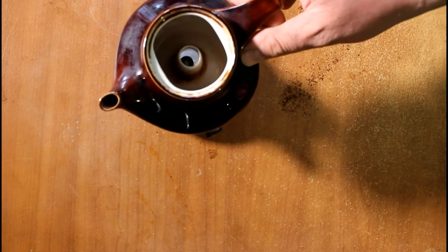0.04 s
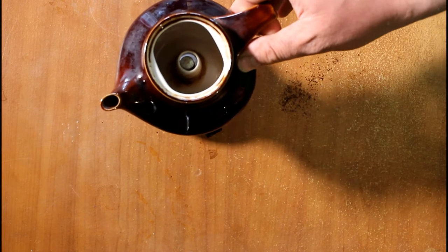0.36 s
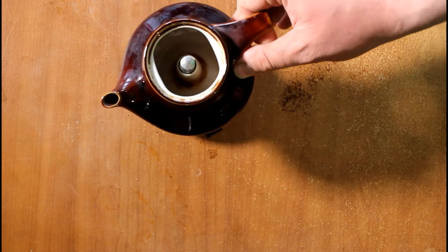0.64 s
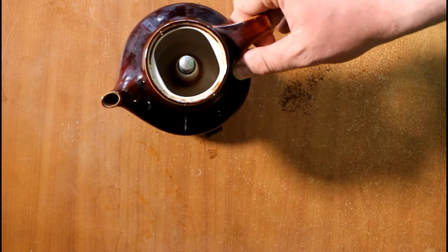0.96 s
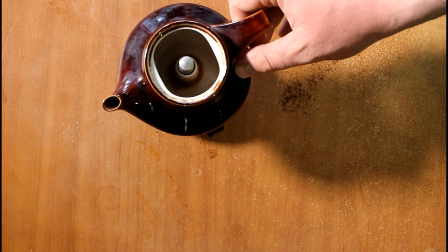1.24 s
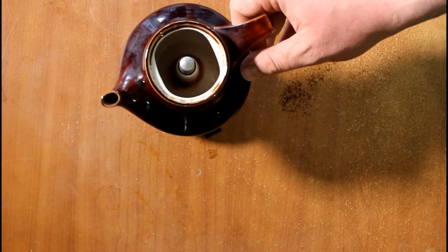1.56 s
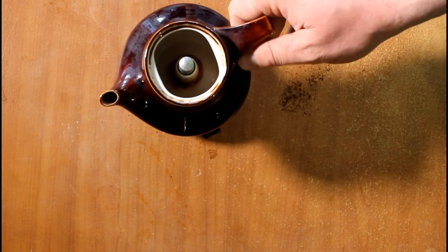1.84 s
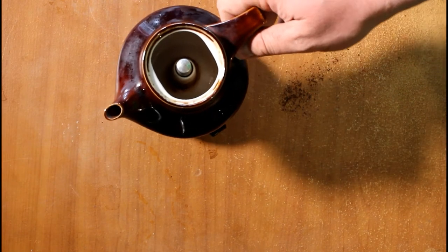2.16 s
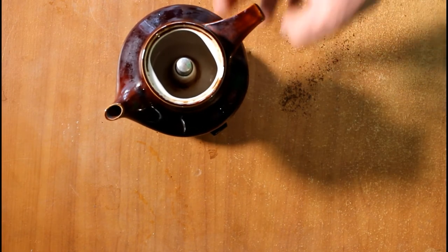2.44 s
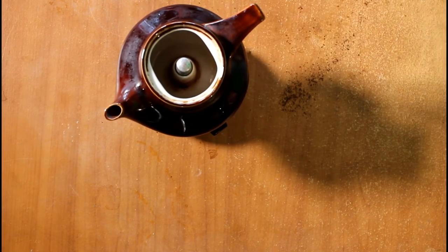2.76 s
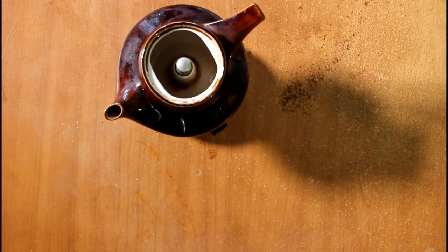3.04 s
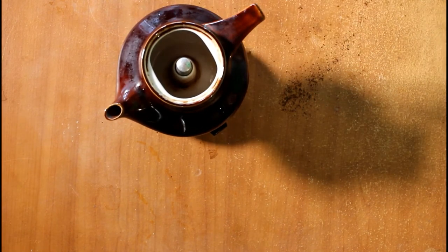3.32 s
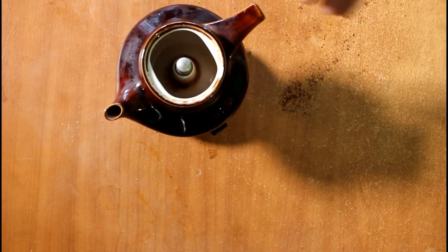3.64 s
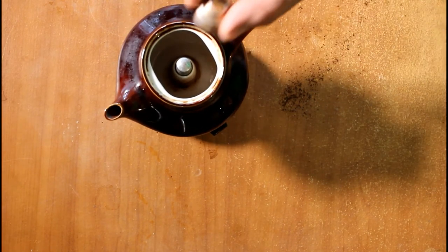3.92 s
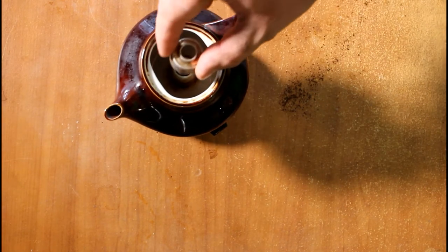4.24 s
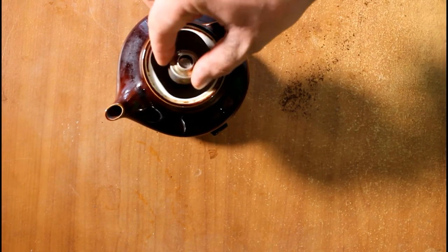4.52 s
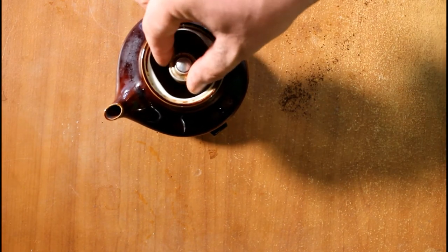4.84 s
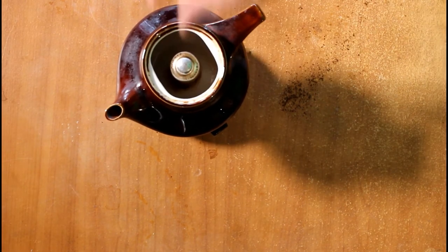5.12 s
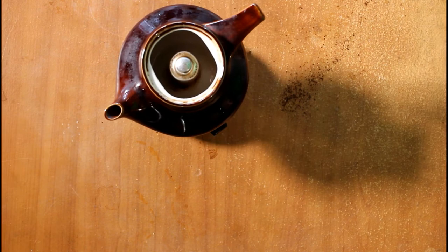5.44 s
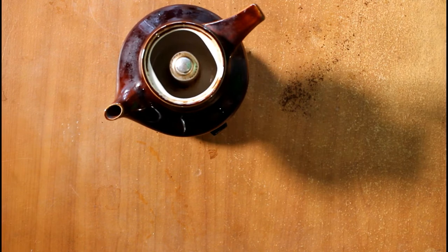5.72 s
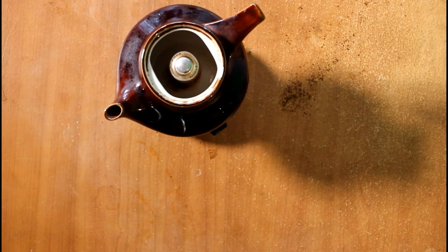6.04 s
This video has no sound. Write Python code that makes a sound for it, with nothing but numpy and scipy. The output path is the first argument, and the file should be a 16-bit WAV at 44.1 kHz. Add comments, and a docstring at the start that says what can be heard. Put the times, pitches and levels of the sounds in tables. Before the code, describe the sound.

A porcelain teapot scrapes and clanks onto a metal pot, knocks as it settles, then a small metal cap clinks inside.

```python
"""A wooden table in a small quiet room, one microphone close in front. A porcelain teapot scrapes down
onto a metal pot, catching and slipping, and lands at 0.7 s with a clank that overloads the microphone.
It rocks and settles, fingertips squeaking on the glaze; near 3 s a sleeve swishes and a hand scuffs.
At 4.5 s a small metal cap is lowered through the teapot's mouth and clinks against the china.
It is seated on the pot's stem at 5.1 s, and the sleeve swishes twice more over the room's air."""
import sys
import numpy as np
from scipy import signal
from scipy.fft import rfft, irfft, next_fast_len
from scipy.io import wavfile
from scipy.ndimage import map_coordinates

SR = 44100
rng = np.random.default_rng(int(sys.argv[2]) if len(sys.argv) > 2 else 0)


def store_wav(level_fs):
    """Save 16-bit WAV to argv[1]."""
    pcm = np.round(np.clip(np.atleast_2d(level_fs), -1, 1) * 32767)
    wavfile.write(sys.argv[1], SR, pcm.T.astype(np.int16))


N = 268172
T = np.arange(SR * 3 // 5) / SR  # the time that one contact rings [s]

# Knocks that ring the pot: the teapot against it, and at 5.1 s the cap seating on its stem; # base, wall and
# china are relative to the force: # (time [s], force [dB], base [dB], wall [dB], china [dB], contact hardness
# [Hz])
POT_KNOCKS = [(0.236, -36, 2.5, -13, -10, 4960), (0.264, -32, -1, -29, 6, 5530),
              (.299, -32, -6, -27, 8, 4000), (0.668, -14, -4.5, -1.5, -17, 1540),
              (0.6856, 1, 8, 5, -10, 8060), (0.728, -35, -1, 15, -1, 4000),
              (0.8003, -11, 15, 7, 2.5, 4100), (1.026, -58.5, -7, -13, 34.5, 3010),
              (1.078, -29.5, 10, -26, -20, 900), (1.759, -31.5, 2.5, -16, -18, 900),
              (1.816, -27, -8, -5, 4, 7100), (1.9474, -25.5, 4, -16, -8, 3246),
              (2.3098, -9, 13.5, 3.5, 7, 7740), (2.3755, -21, 5, -3, -15, 2000),
              (2.831, -35.5, -16, -17, -20, 350), (5.1053, -31, 15, 6.5, 11, 2000)]
# Modes of the struck bodies: (frequency [Hz], level [dB], t60 [s])
TABLETOP_MODES = [(78, -24, .4), (156, -14.5, .32), (228, -10, .19), (254, 1, .08), (337, -11.5, .2),
                  (394, -15, .21)]
POT_BASE_MODES = [(580, -20, .08), (640, 0, .06), (712, -22, .11), (1040, -24, .06)]
POT_WALL_MODES = [(1390, -11, .07), (1662, -9, .055), (1775, -5, .055), (1799, -8.5, .13), (1855, -12, .15),
                  (1884, -8.5, .1), (2060, -19, .17)]
CHINA_MODES = [(2994, -16, .16), (3068, -16, .19), (3620, -31, .16), (4461, -21, .22), (4759, -24, .12),
               (5678, -26, .22), (7687, -23, .14), (8245, -36, .2)]
# Spectrum of the contact's crack: (frequency [Hz], level [dB])
CRACK_SPECTRUM = [(60, -4), (100, -14), (320, 3.5), (480, -9), (660, 8.5), (850, -7), (1300, -6.5),
                  (1900, -6), (2600, -11), (3800, -7), (7000, -18), (11000, -24), (16000, -21.5)]


def pot_knocks(pass_down_s=0.0025):
    """Each knock rings the china and the pot's wall, then passes down to the pot's base and the table."""
    out = np.zeros(N)
    for s, force_db, base_db, wall_db, china_db, hard_hz in POT_KNOCKS:
        contact = lambda hz: 1 / np.sqrt(1 + (hz / hard_hz) ** 4)  # soft contact cannot drive high modes
        thud = amp(2) * ring(TABLETOP_MODES, contact, scatter_db=1.5)
        clonk = amp(base_db) * ring(POT_BASE_MODES, contact, scatter_db=-3.5)
        chime = amp(china_db) * ring(CHINA_MODES, contact, scatter_db=3.5)
        # the thin wall has a crowd of weak modes around its main ones, which rattle on
        rattle = amp(-24.5) * burst(lambda hz: 1 / (1 + ((hz - 1830) / 240) ** 2), t60=0.42)
        clang = amp(wall_db) * (ring(POT_WALL_MODES, contact, scatter_db=0.5) + rattle)
        crack = burst(lambda hz: amp(along(CRACK_SPECTRUM, hz)) * contact(hz), t60=0.046)
        # the pot rings right under the microphone, so it is almost dry
        strike = in_room(clang + chime, wet_db=-32) + in_room(crack, wet_db=-4.5)
        below = in_room(clonk, wet_db=-22.5) + in_room(thud, wet_db=-23.5)
        add(out, s, amp(force_db) * strike)
        add(out, s + pass_down_s, amp(force_db) * below)
    return out


# Chinks of the sliding teapot, then the cap's contacts:
# (time [s], clack [dB], ring [dB], china over cap [dB], brightness [Hz], spread [octaves])
LIGHT_CONTACTS = [(.468, -30.5, -19, 2, 3920, 0.099), (0.514, -49, -27, -6, 4100, 0.087),
                  (.602, -51, -25.5, -2, 4500, 0.24), (4.469, -22.5, -11, 3.5, 2990, 0.29),
                  (4.4704, -21.5, -4, -15, 6460, 1.37), (4.6793, -39, -16, -10, 4600, 0.22),
                  (4.679, -64, -29.5, 21, 7800, 0.16), (4.7402, -36.5, -47, 13, 3070, 0.33),
                  (4.8393, -38, -50, 3, 3000, .25), (4.9251, -25.5, -51, 3, 2600, 0.37),
                  (4.9658, -21.5, -14, 10, 7340, 0.12), (4.993, -30, -28, 5.5, 3300, 0.28),
                  (5.1056, -21.5, -52, 6, 2320, 0.34)]
# Modes of the metal cap: (frequency [Hz], level [dB], t60 [s])
CAP_MODES = [(3280, -11, .04), (3695, -14, .13), (4765, -3, .07), (5655, -13, .035), (7230, -19, .07),
             (8500, -14, .035), (9735, -10, .11), (13100, -22, .06), (13800, -25, .05)]
# Spectra of china ticking on metal and of the duller clack: (frequency [Hz], level [dB])
TICK_SPECTRUM = [(400, -41), (1700, 3.5), (2500, -8.5), (3200, 4.5), (4000, -1), (5400, -6.5), (6500, -15),
                 (8000, -11.5), (9700, -5), (11200, -27.5), (13200, -31), (16000, -45)]
CLACK_SPECTRUM = [(100, -21), (420, 0.5), (600, 8), (1200, 6.5), (2000, -2.5), (3500, -15.5), (8000, -31.5),
                  (16000, -60)]


def clinks(jolt_hz=3300):
    """Light hard contacts tick, ring china and cap, and clack down the stem into the table."""
    out = np.zeros(N)
    for s, clack_db, ring_db, china_db, bright_hz, octaves in LIGHT_CONTACTS:
        band = lambda hz: 1 / (1 + (np.log2((hz + 1) / bright_hz) / octaves) ** 2)
        tick_colour = lambda hz: amp(along(TICK_SPECTRUM, hz)) * band(hz)
        tick = amp(ring_db - 2) * burst(tick_colour, t60=0.021, swell_s=0.0003)
        chime = amp(ring_db + china_db) * ring(CHINA_MODES, band, scatter_db=2)
        ping = amp(ring_db) * ring(CAP_MODES, band, scatter_db=2)
        clack = amp(clack_db) * burst(lambda hz: amp(along(CLACK_SPECTRUM, hz)), t60=0.057)
        thud = amp(clack_db - 15.5) * ring(TABLETOP_MODES, lambda hz: 1, scatter_db=-4.5)
        # the clack jolts the teapot and rings its lowest modes
        jolt = amp(clack_db) * ring(CHINA_MODES, lambda hz: 1 / (1 + (hz / jolt_hz) ** 8), scatter_db=1)
        add(out, s, in_room(chime + ping + jolt, wet_db=-9.5))
        add(out, s, in_room(tick, wet_db=-5.5))
        add(out, s, in_room(clack + thud, wet_db=-5))
    return out


# Shoves of the teapot over the metal, as at full effort:
# (time [s], length [s], judder [dB], grit [dB], chatter rate [Hz])
TEAPOT_SHOVES = [(0, 0.0057, -21, -36.5, 290), (0.241, 0.082, -21, -29, 225),
                 (0.475, 0.28, -22.5, -32, 250)]
# Spectra of the scrape's low judder and high grit: (frequency [Hz], level [dB])
JUDDER_SPECTRUM = [(47, -65), (80, -45.5), (146, -2.5), (187, -9.5), (242, -3.5), (343, -10.5), (390, -5.5),
                   (438, -15), (567, -17), (655, -15), (1100, -29), (1850, -38), (2500, -42.5), (3250, -66),
                   (5500, -120)]
GRIT_SPECTRUM = [(900, -27.5), (1600, -9.5), (2500, -4), (3100, -8), (4200, 12.5), (4750, 2), (5300, -46),
                 (8000, -8.5), (12000, -31), (16000, -29)]


def teapot_slide(slips_per_s=550, sing_hz=3650, chatter_sag=0.074, grit_lead_s=0.03, rise_s=0.12):
    """Unglazed china catches and slips on metal: the stack judders, the foot chatters, the teapot sings."""
    slips = (rng.random(N) < slips_per_s / SR) * rng.uniform(-1.02, 1, N)
    friction = unit(unit(slips) + 0.84 * rng.standard_normal(N))
    judder = unit(filtered(friction, lambda hz: amp(along(JUDDER_SPECTRUM, hz))))
    grit = amp(-5) * unit(filtered(friction, lambda hz: amp(along(GRIT_SPECTRUM, hz))))
    china = ring(CHINA_MODES, lambda hz: 1 / (1 + ((hz - sing_hz) / 1200) ** 2), scatter_db=0)
    rubbed_china = signal.fftconvolve(friction, china)[:N]
    song = amp(-4) * unit(filtered(rubbed_china, lambda hz: amp(along(GRIT_SPECTRUM, hz) / 2)))
    out = np.zeros(N)
    for s, length, judder_db, grit_db, chatter_hz in TEAPOT_SHOVES:
        push = lambda seconds: effort(s, seconds, rise_s, from_db=-13.5, fall_db_per_s=150.5)
        sagging_hz = chatter_hz * (1 - chatter_sag * (1 - push(length)))
        chatter = waver(sagging_hz, jitter=0.046, knots_per_s=110)
        out += amp(judder_db) * push(length) * judder
        # the grit and the teapot's song ease earlier than the judder and swing less
        out += amp(grit_db) * push(length - grit_lead_s) ** 0.8 * (grit + song)
        # the chatter swings more and peaks as the foot breaks free
        out += amp(judder_db + 2) * push(min(length, rise_s)) ** 1.6 * chatter
    until_landing = np.interp(np.arange(N) / SR, [0.68, 0.71], [1, 0])
    return in_room(out * until_landing, wet_db=-18)


# Scuffs of the moving hand: (time [s], level [dB], t60 [s])
HAND_SCUFFS = [(2.969, -31, 0.077), (3.002, -40.5, 0.34), (3.044, -31.5, 0.065), (3.159, -37, 0.075),
               (4.644, -42.5, 0.7)]


def hand_scuffs(rise_s=0.0033):
    """The hand brushes dully, farther from the microphone."""
    out = np.zeros(N)
    for s, db, t60 in HAND_SCUFFS:
        add(out, s, amp(db) * noise(CLACK_SPECTRUM, len(T)) * fade(t60) * (1 - np.exp(-T / rise_s)))
    return in_room(out, wet_db=-4)


# Fingertips on the glaze: (time [s], length [s], pitch [Hz], level [dB])
GLAZE_SQUEAKS = [(.0, .055, 3600, -46), (.03, .06, 1390, -53), (.07, .06, 3600, -53),
                 (1.88, .07, 7690, -57), (2.11, .17, 4080, -58)]


def finger_squeaks():
    """Thin stick-slip tones swell and stop as the fingers shift their grip."""
    out = np.zeros(N)
    for s, length, hz, db in GLAZE_SQUEAKS:
        n = round(length * SR)
        add(out, s, amp(db) * waver(hz, jitter=0.016, knots_per_s=950)[:n] * np.sqrt(arch(n)))
    return in_room(out, wet_db=-12.5)


# Movements of the arm: (time [s], length [s], level [dB])
SLEEVE_SWISHES = [(2.574, 0.26, -50), (3.904, 0.22, -63.5), (5.221, 0.41, -50.5), (5.714, 0.38, -49.5)]
# Spectrum of rubbing cloth: (frequency [Hz], level [dB])
CLOTH_SPECTRUM = [(1000, 7), (3000, 3), (6500, 3), (9000, 0.5), (13000, -7), (16000, -21)]


def sleeve():
    """Cloth rubs on cloth near the microphone: a faint hiss that rises and falls with each movement."""
    out = np.zeros(N)
    for s, length, db in SLEEVE_SWISHES:
        n = round(length * SR)
        add(out, s, amp(db) * noise(CLOTH_SPECTRUM, n) * arch(n))
    return out


# The hand's weight on the table: (time [s], length [s], level [dB])
HAND_LEANS = [(0.307, 0.7, -41), (.67, 0.13, -38.5), (1.65, .3, -41), (1.967, 0.49, -40.5),
              (2.84, 0.14, -43), (4.43, 0.5, -47.5), (4.872, 0.12, -34.5)]
# Spectrum of the table's slow sway: (frequency [Hz], level [dB])
SWAY_SPECTRUM = [(12, -32), (22, -3.5), (30, -6), (36, -2), (46, -24.5), (68, -15.5), (80, -20.5),
                 (100, -35), (140, -57)]


def table_sway():
    """The hand's weight sets the table swaying: a deep rumble that dies away after each lean."""
    power = sum((amp(db) * effort(s, length, rise_s=0.044, from_db=-13, fall_db_per_s=33.5)) ** 2
                for s, length, db in HAND_LEANS)
    return np.sqrt(power) * noise(SWAY_SPECTRUM, N)


# Spectra of the room's air and of a trace of hiss: (frequency [Hz], level [dB])
AIR_SPECTRUM = [(15, -32), (25, -14.5), (74, -7), (97, -24.5), (114, -10), (166, -3), (270, -13.5),
                (309, -12.5), (405, -16), (575, -17), (818, -19.5), (1070, -20), (4030, -29), (6050, -31),
                (16000, -49.5)]
HISS_SPECTRUM = [(15, -33.5), (25, -11.5), (206, -0.5), (624, -3), (677, -3), (1260, -6), (7510, -5),
                 (14800, -7.5), (16000, -9.5)]


def background():
    """Room air and the table's sway in the centre, with a hiss that differs between the channels."""
    air = amp(-49) * noise(AIR_SPECTRUM, N)
    return air + table_sway() + amp(-52.5) * noise(HISS_SPECTRUM, (2, N))


# Reverberation of the small room: (frequency [Hz], t60 [s])
ROOM_DECAY = [(100, 0.99), (500, 0.39), (2000, 0.34), (5000, 0.17), (12000, 0.13)]


def in_room(x, wet_db, build_s=0.0013):
    """The direct sound plus a diffuse tail that builds up as the walls answer."""
    hz, t, spectra = signal.stft(rng.standard_normal(len(T)), SR, nperseg=256)
    decay = np.exp(-np.log(1000) * t / along(ROOM_DECAY, hz)[:, None])
    tail = signal.istft(spectra * decay, SR, nperseg=256)[1][:len(T)]
    tail *= 1 - np.exp(-(T / build_s) ** 2)
    return x + amp(wet_db) * signal.fftconvolve(x, tail / np.linalg.norm(tail))[:len(x)]


def ring(modes, weight, scatter_db, swell_s=0.0024):
    """Damped modes swell while the contact lasts; the spot that is struck scatters their strengths."""
    spot_db = scatter_db * rng.standard_normal(len(modes))
    tones = sum(amp(db + change) * weight(hz) * np.sin(2 * np.pi * hz * T) * fade(t60)
                for (hz, db, t60), change in zip(modes, spot_db))
    return tones * (1 - np.exp(-T / swell_s))


def burst(response, t60, swell_s=0.00061):
    """Dense, heavily damped modes: coloured noise that dies quickly."""
    return unit(filtered(rng.standard_normal(len(T)), response)) * fade(t60) * (1 - np.exp(-T / swell_s))


def waver(hz, jitter, knots_per_s):
    """A stick-slip tone whose pitch wanders along a smooth random curve."""
    knots = rng.standard_normal(int(N * knots_per_s / SR) + 4)
    wobble = map_coordinates(knots, [np.arange(N) * knots_per_s / SR])
    return np.sqrt(2) * np.sin(2 * np.pi * np.cumsum(hz * (1 + jitter * wobble)) / SR)


def effort(s, length, rise_s, from_db, fall_db_per_s):
    """Gain of one push: it builds from from_db towards full and dies away once its length is over."""
    t = np.arange(N) / SR - s
    built = np.clip(np.minimum(t, length) / rise_s, 0, 1)
    onset = np.clip(t / 0.0037, 0, 1)
    return amp(from_db * (1 - built) - fall_db_per_s * np.maximum(t - length, 0)) * onset


def fade(t60):
    """A decay of 60 dB in t60 seconds."""
    return np.exp(-np.log(1000) * T / t60)


def arch(n):
    """Half a sine over n samples."""
    return np.sin(np.pi * np.arange(n) / n)


def noise(spectrum, size):
    """Coloured noise of rms 1."""
    return unit(filtered(rng.standard_normal(size), lambda hz: amp(along(spectrum, hz))))


def filtered(x, response):
    """Shape x by a gain that depends on frequency."""
    n = x.shape[-1]
    padded = next_fast_len(n + 8192)
    return irfft(rfft(x, padded) * response(np.fft.rfftfreq(padded, 1 / SR)), padded)[..., :n]


def along(points, hz):
    """Read (Hz, value) points on a log axis."""
    frequencies, values = np.transpose(points)
    return np.interp(np.log(hz + 1), np.log(frequencies + 1), values)


def amp(db):
    """Decibels to gain."""
    return 10 ** (np.asarray(db) / 20)


def unit(x):
    """Scale to rms 1."""
    return x / np.sqrt(np.mean(x ** 2) + 1e-20)


def add(track, s, sound):
    """Mix a sound in at s seconds."""
    part = track[max(round(s * SR), 0):][:len(sound)]
    part += sound[:len(part)]


def scene():
    """All action is straight in front of the microphone; bright echoes, rumble and hiss give width."""
    near = pot_knocks() + clinks() + hand_scuffs() + teapot_slide() + finger_squeaks() + sleeve()
    echoes = in_room(near, wet_db=-22.5) - near
    bright_echoes = filtered(echoes, lambda hz: hz ** 2 / (hz ** 2 + 2500 ** 2))
    rumble = amp(-69) * noise(SWAY_SPECTRUM, N)
    sides = (bright_echoes + rumble) * np.array([[1], [-1]])
    return near + sides + background()


def record(dry, top_hz=16000):
    """The close microphone's input saturates at full scale and keeps nothing above its band limit."""
    clipped = dry / (1 + np.abs(dry) ** 8) ** (1 / 8)
    return filtered(clipped, lambda hz: 1 / (1 + (hz / top_hz) ** 240))


dry = scene()
out = record(dry)
store_wav(out)
```